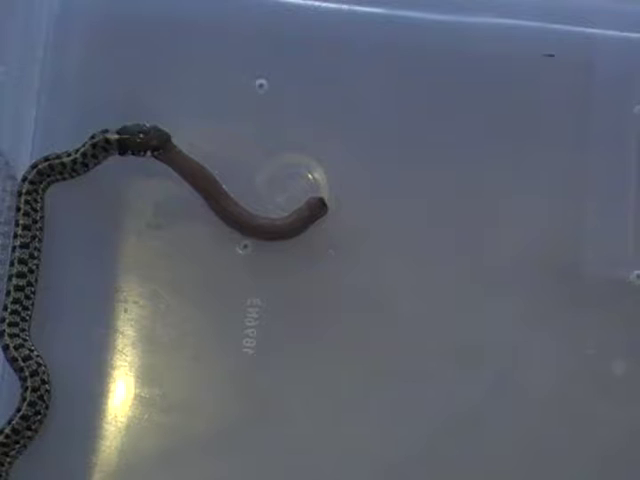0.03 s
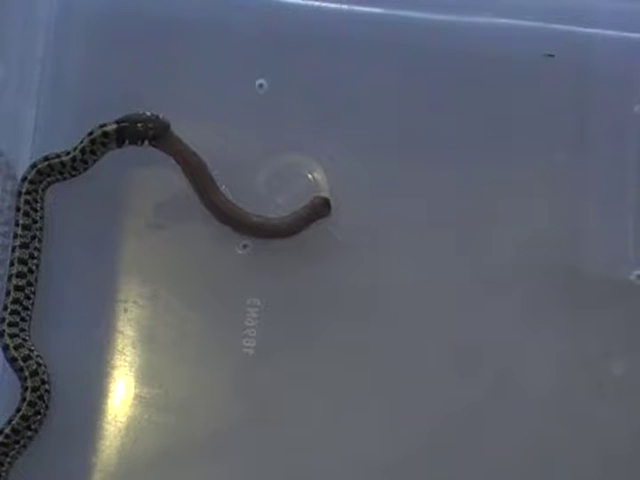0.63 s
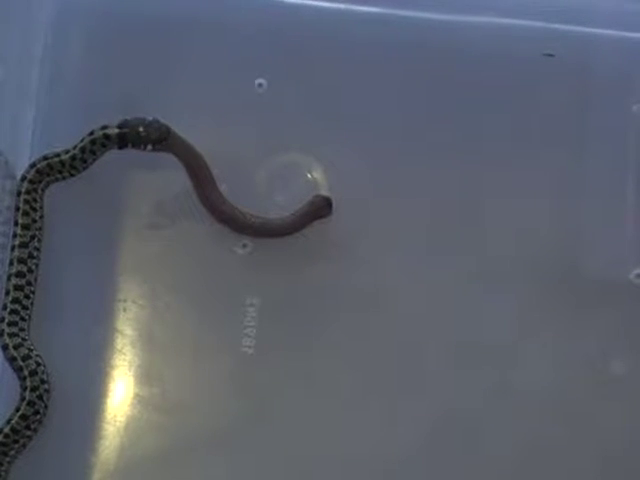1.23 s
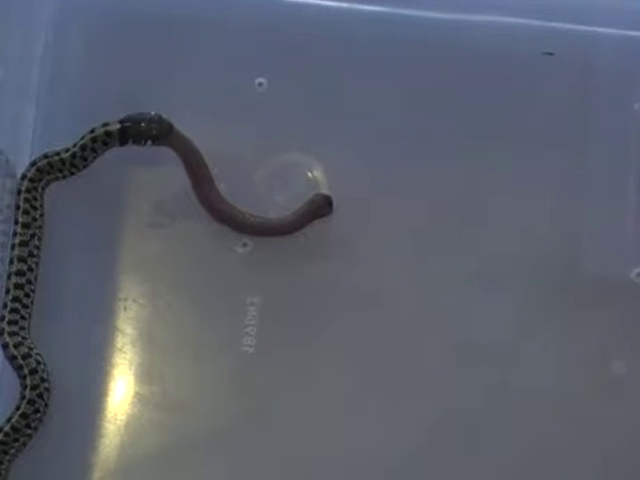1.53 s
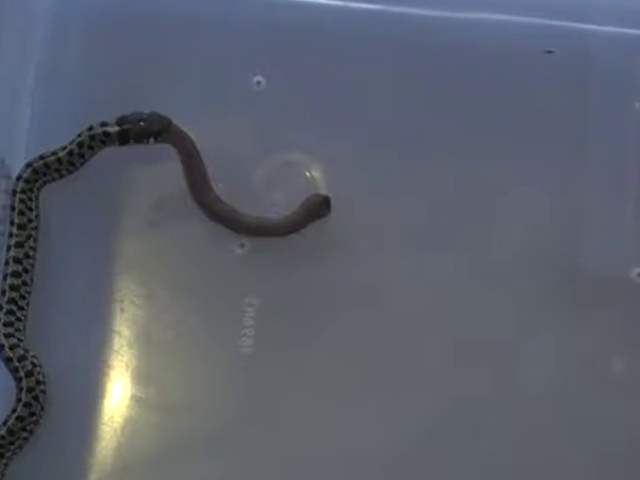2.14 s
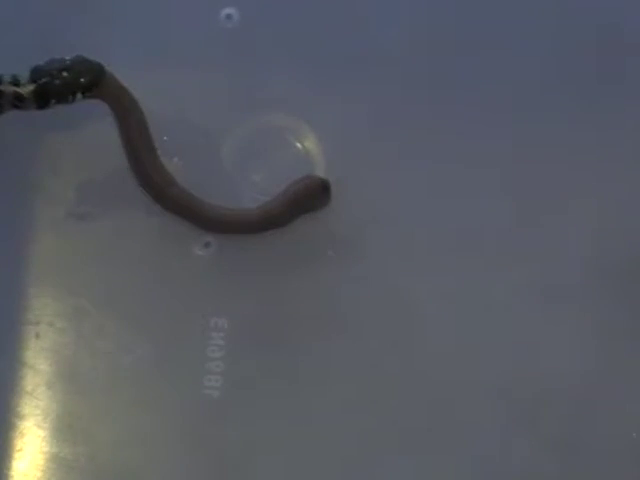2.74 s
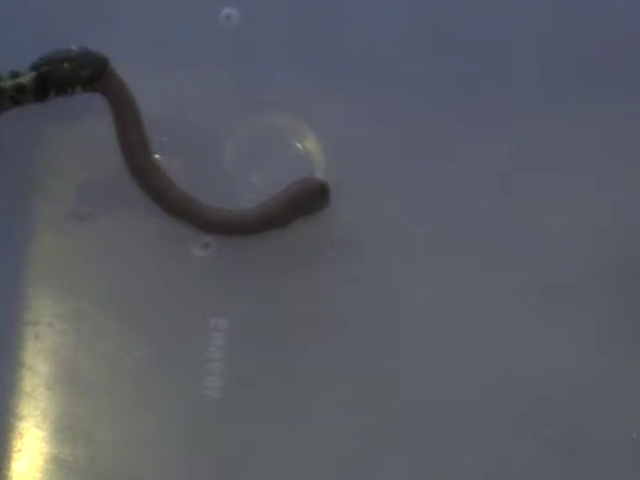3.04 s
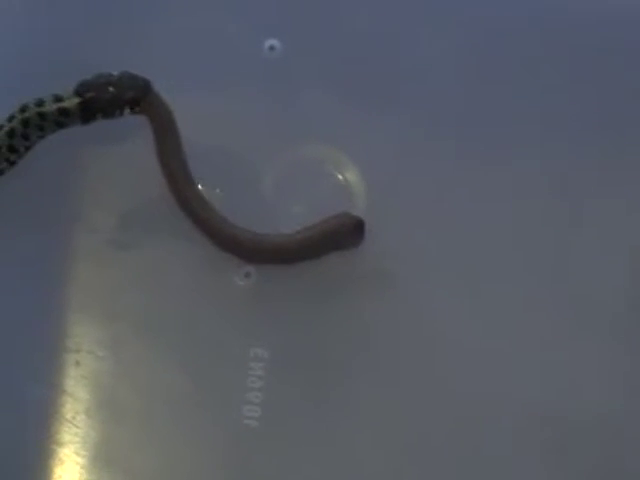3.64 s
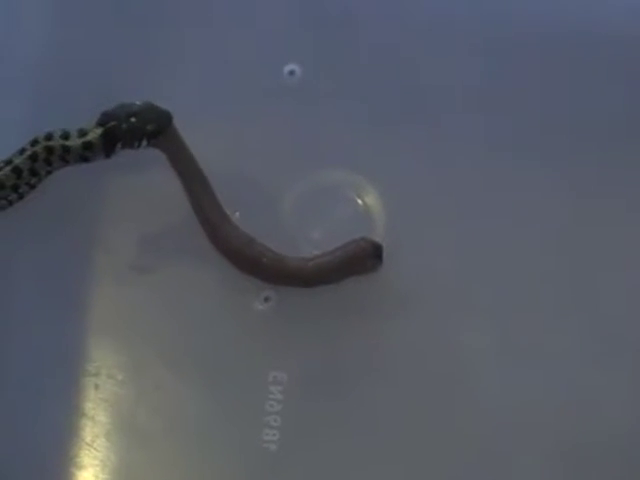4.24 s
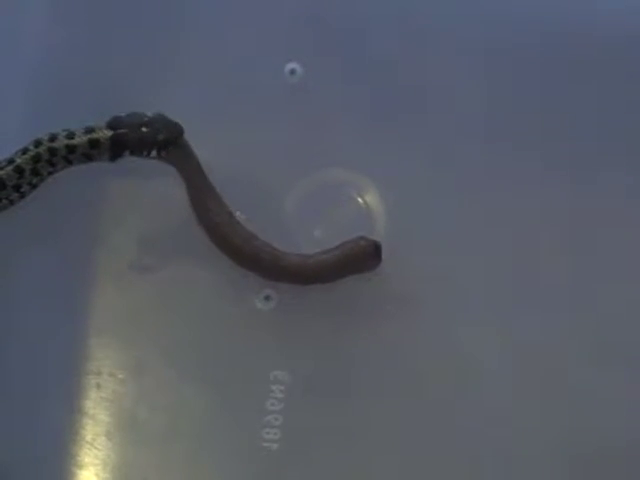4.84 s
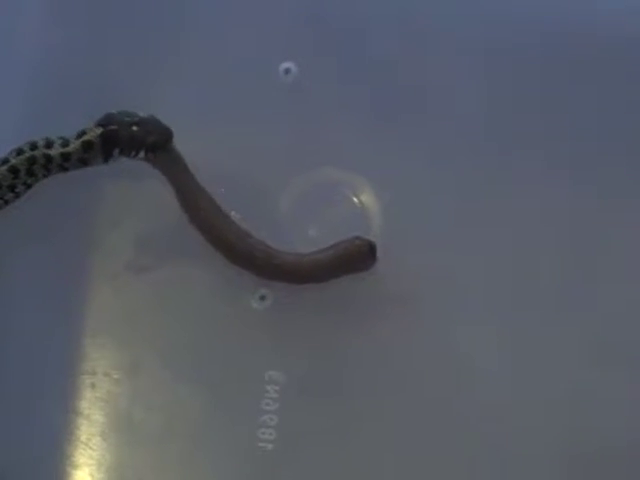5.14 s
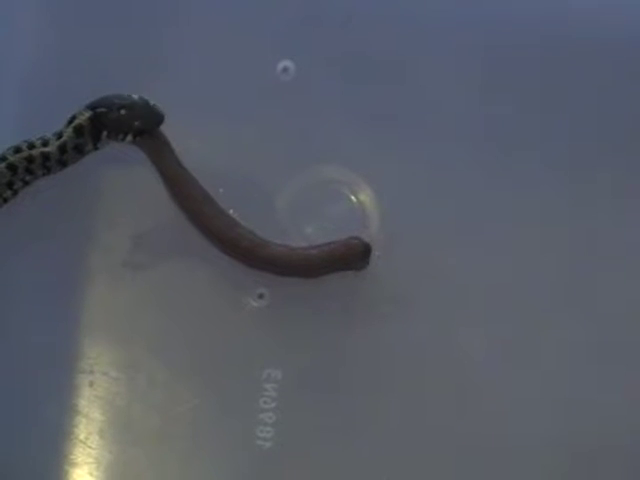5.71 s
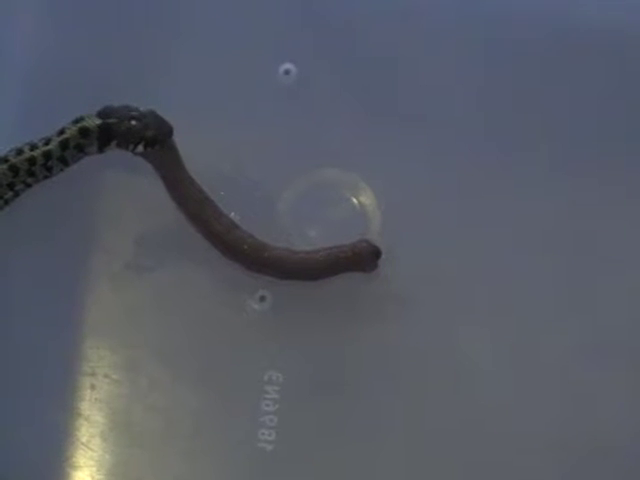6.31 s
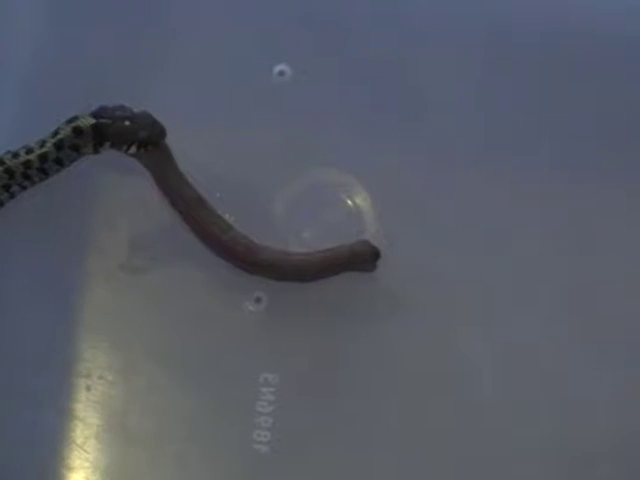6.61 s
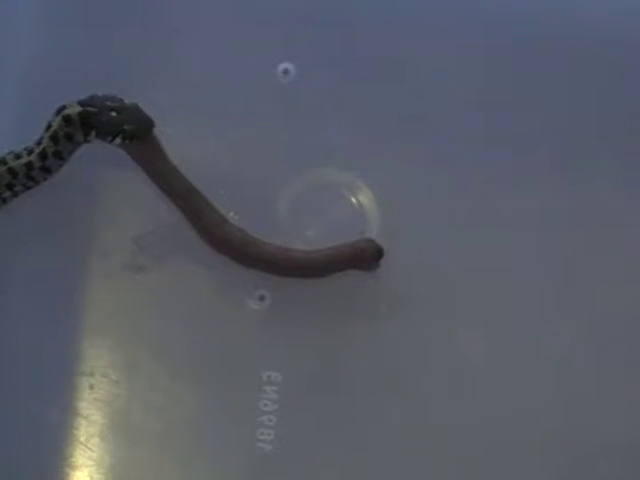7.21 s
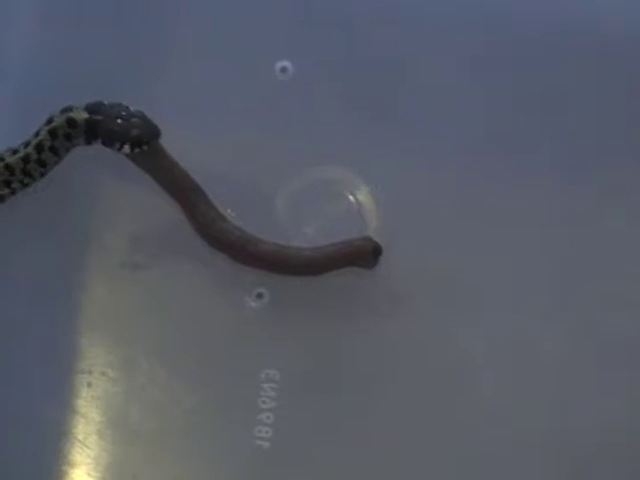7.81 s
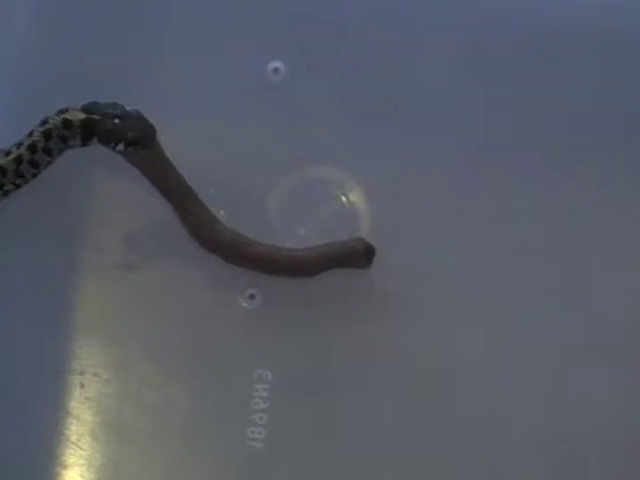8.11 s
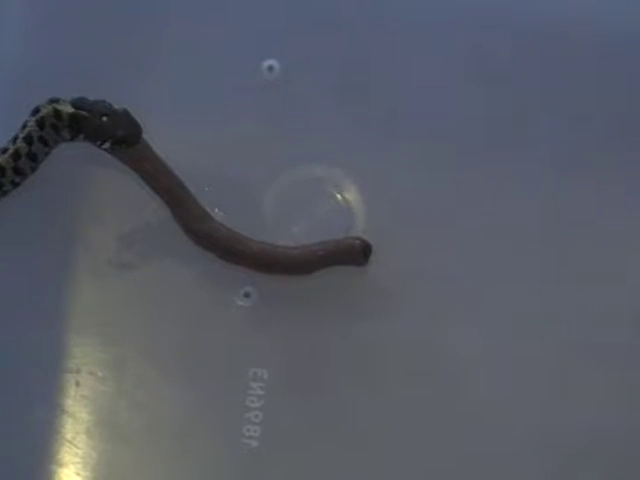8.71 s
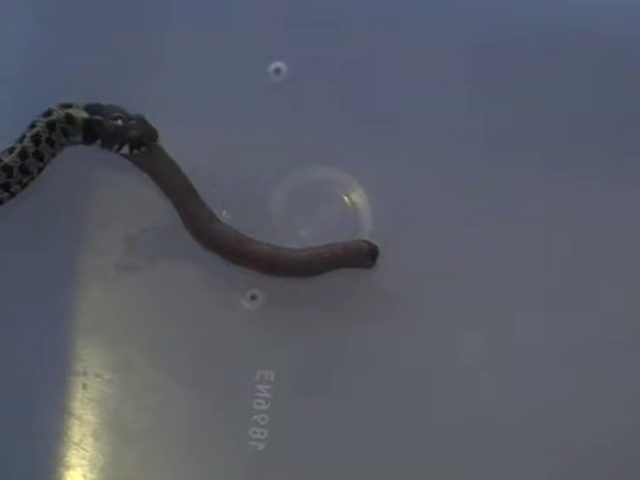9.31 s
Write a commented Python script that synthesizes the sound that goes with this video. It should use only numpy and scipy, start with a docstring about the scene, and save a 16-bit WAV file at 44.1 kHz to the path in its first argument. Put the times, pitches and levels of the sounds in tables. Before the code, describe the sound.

Small, close handling sounds from a camera sit over a steady low fan hum indoors. Light button ticks lead to a sharp knock, a brief thin zoom whirr, the hollow click of a released lever and a second press. Fingers then brush faintly over the plastic now and again, with a few tiny ticks, before a final button click sounds through the case at the microphone.

```python
"""Fingers handle a camera in a quiet room where a fan hums and rushes throughout. Skin rubs over the plastic
case from 0.4 s on, now and then; light button ticks start at 1.3 s. At 2 s a firm press knocks the case,
shaking its two microphones in opposite directions. The zoom motor whirrs for half a second, its lever springs
back, and a press follows at 2.9 s. Faint rubs and hisses keep returning; at 9.1 s, a last press."""
import sys
import numpy as np
from scipy import signal
from scipy.fft import rfft, irfft, next_fast_len
from scipy.io import wavfile

SR = 44100
rng = np.random.default_rng(int(sys.argv[2]) if len(sys.argv) > 2 else 0)


def put_to_file(sound):
    """Save the sound as 16-bit audio at rate SR, in the file named by the first command-line argument."""
    columns = np.atleast_2d(sound).T  # one column per channel
    safe = np.clip(columns, -1, 1)
    whole_steps = np.round(safe * 32767)
    wavfile.write(sys.argv[1], SR, whole_steps.astype(np.int16))


N = 421155
T = np.arange(N) / SR
OPPOSED = np.array([[1], [-1]])  # left +, right -
# spectrum of a tick in the plastic shell: f/Hz, level/dB
SHELL_SPECTRUM = [(60, -45), (150, -16), (500, 1.5), (800, 6.5), (1300, -10), (2100, 8), (2700, 1),
                  (3300, 4.5), (4500, 3.5), (5500, 3.5), (7500, 6.5), (10000, 1.5), (13000, 0.5),
                  (16000, -9)]


def undb(db):
    """Decibels to gain."""
    return 10 ** (np.asarray(db) / 20)


def unit(x):
    """Scale to rms 1."""
    return x / np.sqrt(np.mean(x ** 2))


def over_hz(points, size):
    """(f/Hz, value) table at each FFT bin, interpolated over log f."""
    hz, value = np.transpose(points)
    return np.interp(np.log(np.fft.rfftfreq(size, 1 / SR) + 1e-3), np.log(hz), value)


def noise(spectrum, size):
    """Two independent noises of one spectrum, rms 1."""
    fast = next_fast_len(size)
    phasors = np.exp(2j * np.pi * rng.random((2, fast // 2 + 1)))
    return unit(irfft(phasors * undb(over_hz(spectrum, fast)), fast)[:, :size])


def drift(rate_hz):
    """Random curve, standard deviation near 1."""
    knots = rng.standard_normal(4096)
    return 1.2 * np.interp(T * rate_hz, np.arange(len(knots)), knots)


def band(x, lo_hz, hi_hz, order=2):
    """Butterworth band-pass."""
    return signal.sosfilt(signal.butter(order, [lo_hz, hi_hz], "band", fs=SR, output="sos"), x)


def fade(t, t60_s):
    """Free decay, 60 dB in t60_s."""
    return np.exp(-np.log(1000) * t / t60_s)


def ring(t, hz, t60_s, rise_s=0.00096):
    """One struck mode with a short build-up."""
    return np.sin(2 * np.pi * hz * t) * fade(t, t60_s) * (1 - np.exp(-t / rise_s))


def ring_modes(t, modes):
    """Struck modes, each with its own gain at the right microphone."""
    return sum(undb(db) * ring(t, hz, t60_s) * np.array([[1], [right]])
               for hz, db, t60_s, right in modes)


def knock(t, shudder_db=-24, shudder_t60_s=0.089):
    """The microphone mount rocks sideways for a few cycles; the case rings and shudders."""
    # f/Hz, level/dB, t60/s, gain right/left
    case_modes = [(169, -28, 0.044, 1.23), (290, -35, 0.036, 4), (615, -21, 0.043, -2.55),
                  (741, -16.5, 0.051, 0.52), (988, -11, 0.044, 0), (1185, -33.5, 0.028, 0.6),
                  (1596, -29.5, 0.064, -2), (2153, -43.5, 0.1, 2), (3070, -34, 0.055, 1),
                  (3260, -25.5, 0.026, 1.5)]
    rock = band(1. * (t == 0), 634, 1180, order=4)
    rock = -OPPOSED * rock / np.abs(rock).max()
    shudder = unit(band(rng.standard_normal((2, len(t))), 530, 1650, order=4))
    shudder *= fade(t, shudder_t60_s) * np.clip(t / 0.001, 0, 1)
    return rock + undb(shudder_db) * shudder + ring_modes(t, case_modes)


def snap(size, spread_s=0.001314, grain_hz=168.6):
    """A snap spreads through the shell, each frequency band with its own short delay."""
    hz = np.fft.rfftfreq(size, 1 / SR)
    delay_s = spread_s * np.interp(hz / grain_hz, np.arange(512), rng.exponential(size=512))
    phase = -2 * np.pi * np.cumsum(delay_s) * hz[1]
    wave = irfft(undb(over_hz(SHELL_SPECTRUM, size)) * np.exp(1j * phase), size)
    wave[size // 2:] = 0  # nothing sounds before the contact
    return wave / np.sqrt(np.sum(wave ** 2) / (SR / 1000))  # energy of 1 ms at rms 1


def tick(t, bright_hz, rattle_db, side_db=-2.5, rattle_t60_s=0.045):
    """Plastic snaps, then the shell's dense modes rattle out; a soft touch is duller."""
    rattle = band(noise(SHELL_SPECTRUM, len(t)), 210, 8000) * undb(rattle_db) * fade(t, rattle_t60_s)
    mid, side = np.array([snap(len(t)), snap(len(t))]) + rattle
    lowpass = signal.butter(2, bright_hz, fs=SR, output="sos")
    return signal.sosfilt(lowpass, mid + undb(side_db) * side * OPPOSED)


def button_presses(t, held_hz=4414, held_t60_s=0.0084):
    """Firm presses knock the whole case; the held button rings lower and longer than a tapped one."""
    # t/s, knock/dB, tick/dB, brightness/Hz, button ring/dB, left minus right/dB
    presses = [ (1.9802, -8, -21.5, 7500, -13, -2), (2.9071, -13.5, -28, 5350, -20.5, 0),
               (9.09, -14.5, -31.5, 4800, -25, -3.5)]
    button = ring(t, held_hz, held_t60_s)
    for start_s, knock_db, tick_db, bright_hz, ring_db, pan_db in presses:
        snapped = undb(tick_db) * tick(t, bright_hz, rattle_db=-4.5)
        shaken = undb(knock_db) * knock(t) + undb(ring_db) * button
        yield start_s, pan_db, snapped, shaken


def button_ticks(t, button_hz=4580, t60_s=0.0066, scatter=0.022, knock_db=-7, full_tick_db=-36):
    """Light touches snap, nudge the case and ring a button, each at a slightly different pitch."""
    # t/s, level/dB, brightness/Hz, left minus right/dB
    touches = [ (1.3282, -31.5, 16000, -1), (1.43, -43, 6960, -2), (1.4543, -37, 5800, 1),
               (1.4715, -45.5, 6500, -3), (1.5704, -44.5, 8800, 0), (1.6733, -35.5, 6950, -3),
               (1.7063, -50, 7000, -3), (1.729, -51, 12000, 5), (1.743, -48.5, 9000, -3),
               (1.769, -33, 10800, -2.5), (1.95, -44.5, 3000, 3), (3.3203, -47, 2500, 3),
               (5.421, -59, 15000, -6), (7.919, -53.5, 6000, 0)]
    for (start_s, db, bright_hz, pan_db), detune in zip(touches, rng.standard_normal(len(touches))):
        ring_db = 11 + 0.39 * min(db - full_tick_db, 0)  # softer ticks ring less
        hardness = min(bright_hz / button_hz, 1) ** 2  # a dull tap barely reaches the button's pitch
        button = hardness * undb(ring_db) * ring(t, button_hz * (1 + scatter * detune), t60_s)
        shaken = undb(knock_db) * knock(t) + button
        snapped = tick(t, bright_hz, rattle_db=-10.5)
        yield start_s, pan_db, undb(db) * snapped, undb(db) * shaken


def lever_return(t, knock_db=2.5, pan_db=1.0):
    """The released zoom lever hits its stop with a hollow ring, then twice more, faintly."""
    # t/s, level/dB
    hits = [(2.4859, -26.5), (2.522, -50), (2.536, -53)]
    # f/Hz, level/dB re hit, t60/s, gain right/left
    lever_modes = [(1294, 2.5, 0.025, 0.7), (2480, -2.5, 0.014, 1), (3900, 8.5, 0.0067, 1.4),
                   (4500, 4.5, 0.0083, 1.4)]
    lever = ring_modes(t, lever_modes)
    for start_s, db in hits:
        snapped = tick(t, bright_hz=5250, rattle_db=-8.5)
        shaken = undb(knock_db) * knock(t) + lever
        yield start_s, pan_db, undb(db) * snapped, undb(db) * shaken


def clicks():
    """Knocks and rings travel through the case; ticks travel through the air and reach the walls."""
    t = np.arange(SR // 6) / SR
    airborne, in_case = np.zeros((2, 2, N + len(t)))
    for start_s, pan_db, snapped, shaken in [*button_ticks(t), *button_presses(t), *lever_return(t)]:
        span = slice(int(start_s * SR), int(start_s * SR) + len(t))
        pan = undb(OPPOSED * pan_db / 2)
        airborne[:, span] += pan * snapped
        in_case[:, span] += pan * shaken
    return (band(in_case, 100, 9700) + airborne + wall_reverb(airborne))[:, :N]


def wall_reverb(x, wet_db=-18, t60_s=0.74):
    """The bright part of a sound returns from the walls."""
    t = np.arange(SR // 2) / SR
    tail = rng.standard_normal((2, len(t))) * fade(t, t60_s) * np.clip(t / 0.0027, 0, 1)
    tail /= np.sqrt(np.sum(tail ** 2, axis=1, keepdims=True))
    return undb(wet_db) * signal.fftconvolve(band(x, 1500, 10600), tail, axes=1)[:, :x.shape[1]]


def grainy_hisses(grain_db=2.0):
    """Faint hisses now and then, most of them skin rubbing plastic; a brief one at 6.1 s hisses alike."""
    # t/s, length/s, level/dB before the envelope
    bursts = [(0.363, 0.51, -67.5), (1.353, 0.21, -75), (1.68, 0.12, -73), (4.29, 0.24, -65),
              (5.336, 0.14, -63), (6.11, 0.15, -67), (7.34, 0.4, -71.5), (8.936, 0.18, -57.5),
              (9.375, 0.31, -63)]
    envelope = np.zeros(N)
    for start_s, length_s, db in bursts:
        corners_s = start_s + np.array([0, .01, 0.36 * length_s, length_s])
        envelope += undb(db) * np.interp(T, corners_s, [0, 0.43, 0.36, 0.028])
    grain = undb(grain_db * drift(300))
    hiss = unit(band(rng.standard_normal((2, N)), 2200, 7800))
    return envelope * grain * hiss


def zoom_motor(on_s=2.06, off_s=2.56, ramp_s=.025, start_db=-76.5, rise_db_per_s=18):
    """Small gears whirr in the lens barrel's resonances, growing steadily louder."""
    # f/Hz, width/Hz, level/dB
    barrel_modes = [(4980, 300, -7), (7180, 450, -1.5), (9280, 450, 1)]
    gears = rng.standard_normal((2, N)) * undb(1.7 * drift(200))
    barrel = sum(undb(db) * band(gears, hz - width_hz / 2, hz + width_hz / 2, order=1)
                 for hz, width_hz, db in barrel_modes)
    running = np.clip(np.minimum(T - on_s, off_s - T) / ramp_s, 0, 1)
    elapsed_s = np.clip(T, on_s, off_s) - on_s
    return unit(barrel) * running * undb(start_db + rise_db_per_s * elapsed_s)


def fan_hum(waver_hz=9., side_gain=0.44):
    """Fan and motor tones waver in level and phase, a little differently at each microphone."""
    # f/Hz, level/dB, unsteadiness/0-1
    tones = [(58, -78, .6), (88.5, -71, .5), (111, -73, .5), (175, -73, .7), (220, -65, .95),
             (236, -61, .8), (240, -58, .45), (292, -61, .3), (360, -71, .4), (409, -64, .4),
             (477, -65.5, .4), (586, -71, .4), (972, -78, .5), (1079, -78, .6), (1438, -83, .6),
             (3778, -93, .3), (4257, -88.5, .3), (4317, -93, .3), (6728, -99, .5)]
    hum = np.zeros((2, N))
    for hz, db, unsteady in tones:
        phase = 2 * np.pi * (hz * T + rng.random())
        cos, sin = np.cos(phase), np.sin(phase)
        mid = np.sqrt(2) * cos + unsteady * (drift(waver_hz) * cos + drift(waver_hz) * sin)
        side = side_gain * (drift(waver_hz) * cos + drift(waver_hz) * sin)
        hum += undb(db) / np.hypot(1, unsteady) * (mid + side * OPPOSED)
    return hum


def fan_rush(level_db=-52.0, swell_db=0.54, swell_hz=8.9):
    """Steady rush of air, most alike at the two microphones in the low mids."""
    # f/Hz, relative density/dB
    spectrum = [(25, -33), (42, -8), (60, -8), (100, -2), (200, 0), (330, -1.5), (520, 1.5), (800, -4.5),
                (1100, -7), (1270, -10.5), (1450, -10), (1750, -14.5), (3000, -22), (6000, -29.5),
                (9000, -33.5), (15500, -45)]
    # f/Hz, left-right correlation
    likeness = [(60, -0.16), (120, -0.5), (220, 0.67), (380, 0.51), (700, 0.15), (1300, -0.12),
                (2600, -0.3), (7000, -0.0075)]
    size = next_fast_len(N)
    mid, side = rfft(noise(spectrum, size))
    correlation = over_hz(likeness, size)
    bins = mid * np.sqrt(1 + correlation) + side * np.sqrt(1 - correlation) * OPPOSED
    return unit(irfft(bins, size)[:, :N]) * undb(level_db + swell_db * drift(swell_hz))


def scene(fan_pan_db=-0.58):
    """Camera sounds over the steady fan."""
    fan = (fan_rush() + fan_hum()) * undb(OPPOSED * fan_pan_db / 2)
    return clicks() + grainy_hisses() + zoom_motor() + fan


def record(dry, open_s=.078, top_hz=15750):
    """The microphones open after a moment; a steep low-pass cuts the top."""
    lowpass = signal.ellip(10, .2, 70, top_hz, fs=SR, output="sos")
    return signal.sosfilt(lowpass, dry * (T >= open_s))


dry = scene()
out = record(dry)
put_to_file(out)
```